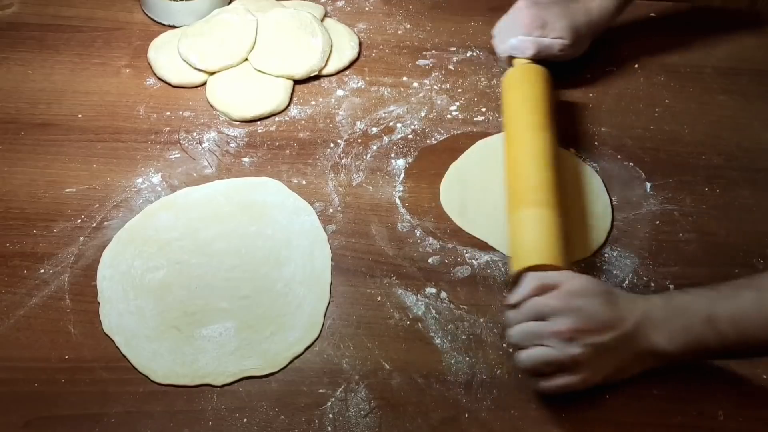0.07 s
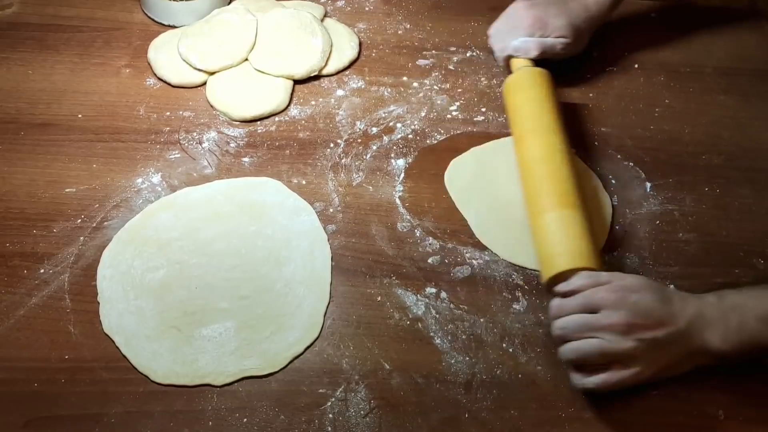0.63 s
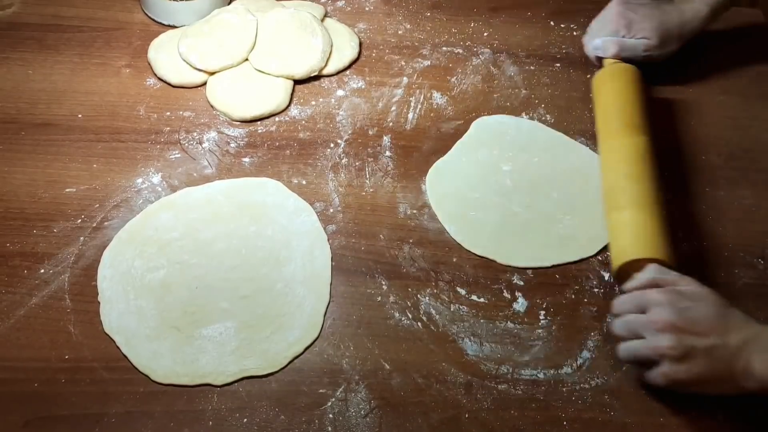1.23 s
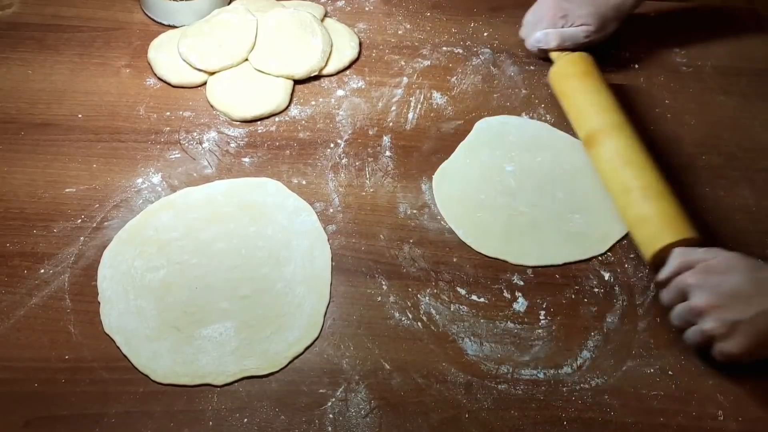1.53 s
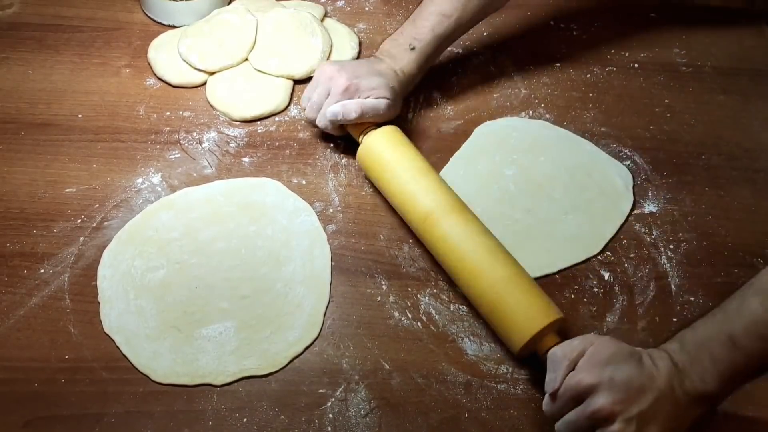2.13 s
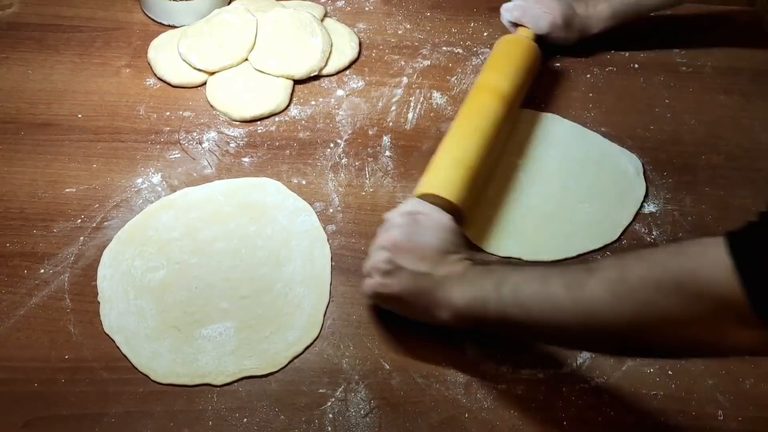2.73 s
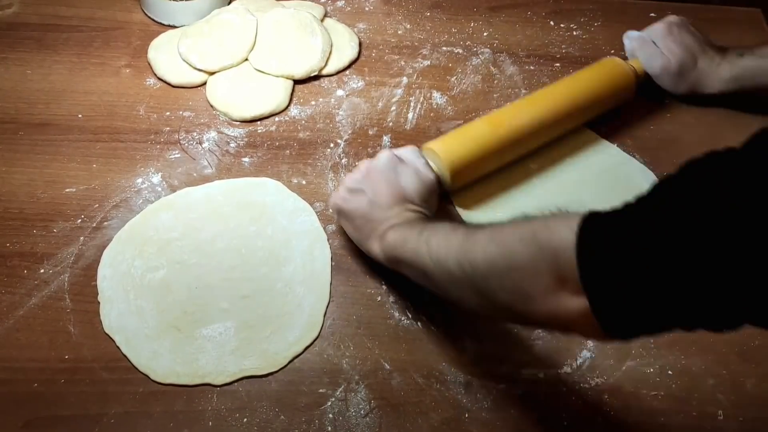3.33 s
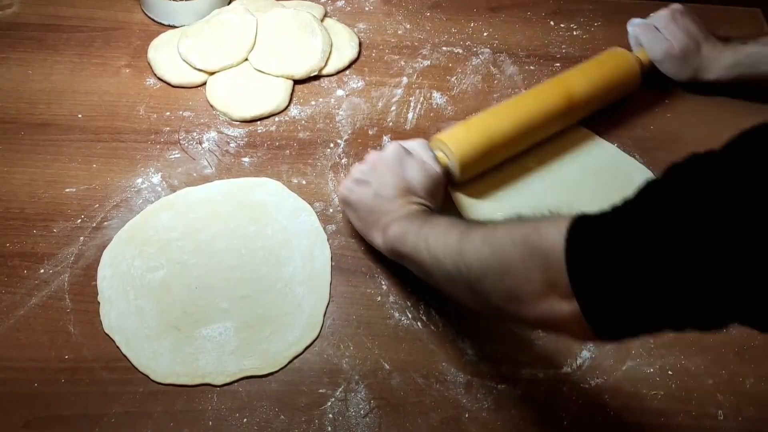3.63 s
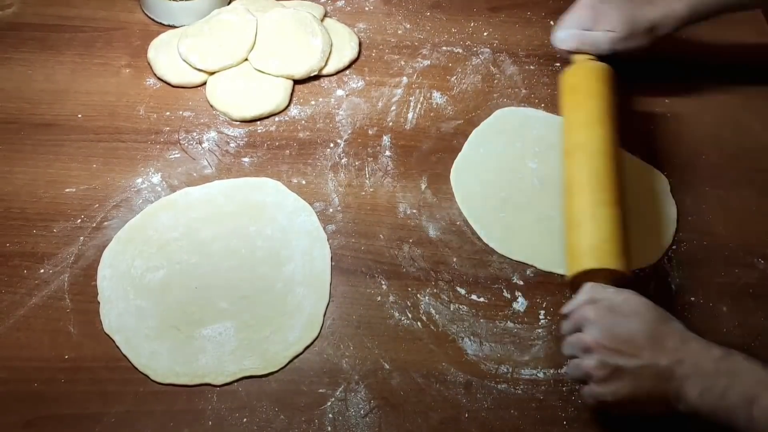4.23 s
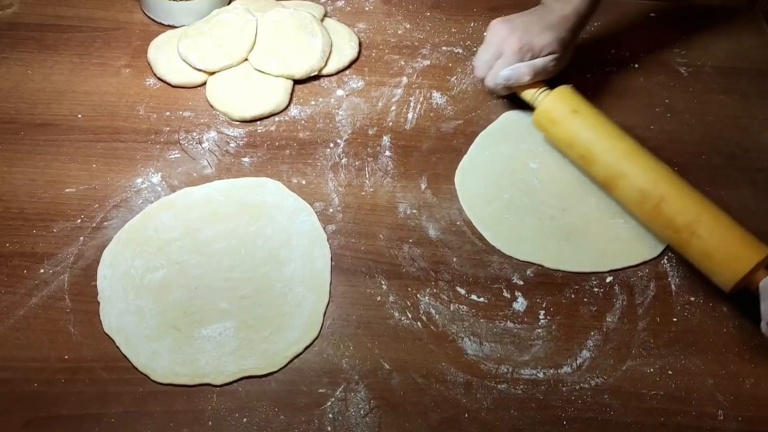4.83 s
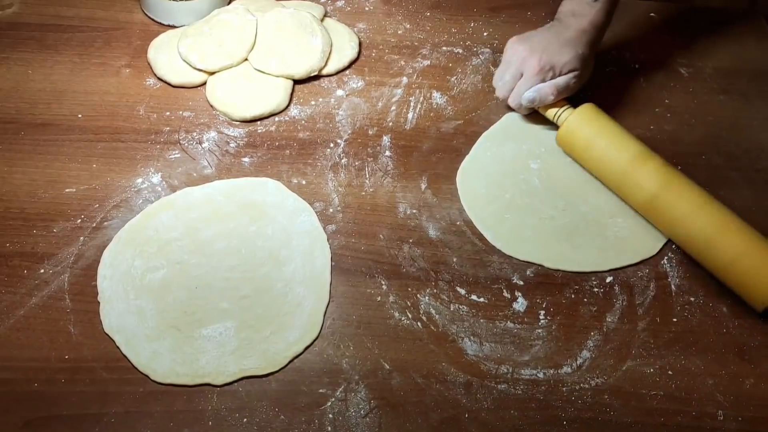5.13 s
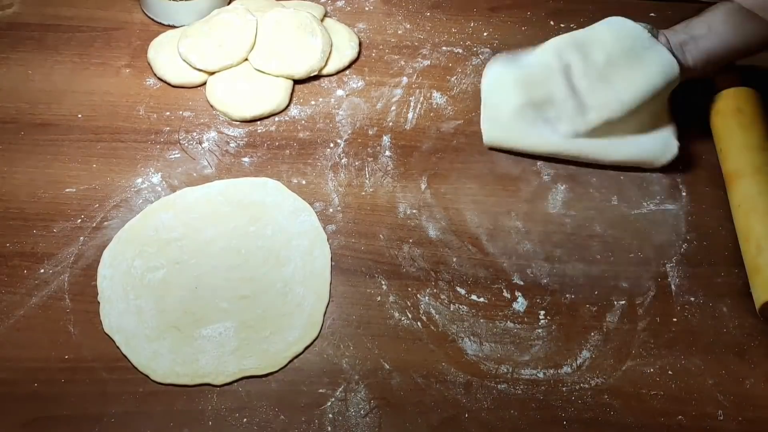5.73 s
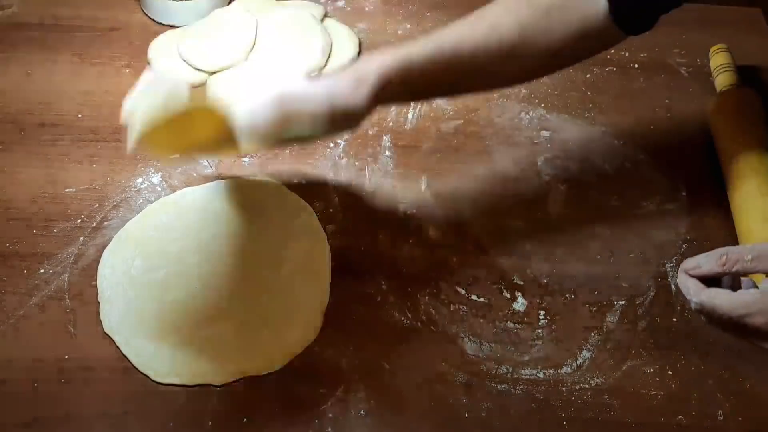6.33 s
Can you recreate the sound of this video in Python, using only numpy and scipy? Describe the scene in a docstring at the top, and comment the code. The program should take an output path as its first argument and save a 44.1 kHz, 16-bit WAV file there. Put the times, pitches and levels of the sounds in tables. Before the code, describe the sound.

A wooden rolling pin works dough on a floured wooden table in a small, quiet room. Each stroke makes a soft, fine swish as the pin turns in the hands. The pin thuds unevenly on the table, with one hard clack early on and a brief squeak midway. At the end the dough slides faintly off the wood and gives one soft flap.

```python
"""Rolling out dough.

A wooden rolling pin works a round of dough on a floured wooden table in a small room. Each stroke
swishes as the pin turns in the hands; the pin thuds on the table where it runs off the dough, sometimes
with a hard clack. At the end the dough slides off the table and is lifted with a soft flap."""
import sys
import numpy as np
from scipy import signal
from scipy.fft import rfft, irfft
from scipy.io import wavfile
from scipy.ndimage import uniform_filter1d

SR = 44100
rng = np.random.default_rng(int(sys.argv[2]) if len(sys.argv) > 2 else 0)


def dump(signal):
    """Clip the signal to [-1, 1] and save it as 16-bit WAV at the path in sys.argv[1]."""
    limited = np.clip(np.atleast_2d(signal).T, -1, 1)
    pcm = np.round(limited * 32767).astype(np.int16)
    wavfile.write(sys.argv[1], SR, pcm)


N = 285327
TIME = np.arange(N) / SR


def amp(db):
    """Decibels to gain."""
    return 10 ** (np.asarray(db) / 20)


def unit(x):
    """Scale to rms 1."""
    return x / np.sqrt(np.mean(x ** 2) + 1e-20)


def curve(points, hz):
    """Interpolate a table over log frequency."""
    points_hz, values = np.transpose(points)
    return np.interp(np.log(hz + 1), np.log(points_hz + 1), values)


def add(mix, start_s, sound):
    """Mix a sound in at start_s."""
    part = mix[max(round(start_s * SR), 0):][:len(sound)]
    part += sound[:len(part)]


def butter(x, hz, kind, order):
    """Causal low-pass or high-pass."""
    sos = signal.butter(order, np.clip(hz, 10, SR / 2 - 100), kind, fs=SR, output="sos")
    return signal.sosfilt(sos, x)


def noise(shape_db, coherence, samples, frame):
    """Stereo noise of rms 1, shaped by shape_db(seconds, Hz) and a left-right coherence table."""
    hop = frame // 4
    t = np.arange(samples // hop + 5)[:, None] * hop / SR
    hz = np.fft.rfftfreq(frame, 1 / SR)
    draws = rng.standard_normal((4, len(t), len(hz)))
    left, independent = draws[::2] + 1j * draws[1::2]
    shared = curve(coherence, hz)
    right = shared * left + np.sqrt(1 - shared ** 2) * independent
    spectra = np.array([left, right]) * amp(shape_db(t, hz))
    _, sound = signal.istft(spectra, nperseg=frame, noverlap=frame - hop, time_axis=1, freq_axis=2)
    return unit(sound[:, :samples])


# Quiet room. Each row: frequency in Hz, relative density in dB.
AMBIENCE_SPECTRUM = [(12, -44), (20, -4.5), (66, -12), (189, -19), (889, -33), (1020, -36), (1310, -37),
                     (2410, -41.5), (2930, -41.5), (8160, -49), (15000, -48)]
# Each row: frequency in Hz, left-right coherence.
AMBIENCE_COHERENCE = [(30, 0), (90, 0), (200, 0.49), (600, 0.6), (2000, 0), (10000, 0.031)]
# Each row: frequency in Hz, left minus right in dB.
AMBIENCE_BALANCE = [(40, -8.5), (200, -14), (700, -7.5), (2400, -0.5), (4400, -0.5), (14000, 2)]


def ambience(level_db=-59):
    """Steady low rumble and faint hiss."""
    sides = np.array([0.5, -0.5])[:, None, None]

    def shape_db(t, hz):
        return curve(AMBIENCE_SPECTRUM, hz) + sides * curve(AMBIENCE_BALANCE, hz)

    return amp(level_db) * noise(shape_db, AMBIENCE_COHERENCE, N, frame=4096)


# Room decay. Each row: frequency in Hz, T60 in seconds.
ROOM_T60 = [(100, 0.17), (300, 0.7), (600, .28), (1500, 0.23), (4000, 0.13), (12000, 0.39)]
# Each row: frequency in Hz, left-right coherence.
ROOM_COHERENCE = [(100, 1), (300, 0.3), (600, 0.15), (1100, 0.95), (2200, 0), (4000, 0.9), (12000, 0.51)]


def room_tail(spectrum, rise_s):
    """Diffuse decay with energy 1 per channel on average."""
    def shape_db(t, hz):
        return curve(spectrum, hz) - 60 * t / curve(ROOM_T60, hz)

    onset = 1 - np.exp(-TIME[:SR] / rise_s)
    return unit(onset * noise(shape_db, ROOM_COHERENCE, SR, frame=256)) / np.sqrt(SR)


def scuff(centre_hz, width_oct, decay_s, rise_s=0.0016, samples=8192):
    """Brief friction: a decaying burst of band noise."""
    t = TIME[:samples]
    offset_oct = np.log2((np.fft.rfftfreq(samples, 1 / SR) + 1) / centre_hz)
    band = np.exp(-0.5 * (offset_oct / width_oct) ** 2)
    hiss = unit(irfft(rfft(rng.standard_normal(samples)) * band))
    return hiss * np.minimum(t / rise_s, 1) * np.exp(-t / decay_s)


# Finger contacts. Each row: start in seconds, level in dB, band centre in Hz.
TOUCHES = [(0.762, -62, 1450), (1.174, -44.5, 408), (2.848, -67, 1620), (6.146, -70, 1000)]


def touches():
    """Fingers brush the pin or the table."""
    mix = np.zeros(N)
    for start_s, db, hz in TOUCHES:
        add(mix, start_s, amp(db) * scuff(hz, width_oct=0.36, decay_s=0.014))
    return mix


# Grip squeaks. Each row: start in seconds, level in dB, pitch in Hz.
SQUEAKS = [(.248, -59.5, 817), (3.31, -36.5, 622)]


def squeaks(tone_s=0.02, jitter=0.074, overtone_db=-24, rasp_db=-23):
    """The pin sticks and slips in the grip: an unsteady tone with a rasp."""
    mix, t = np.zeros(N), TIME[:8192]
    envelope = np.sin(np.pi * np.minimum(t / tone_s, 1))
    for start_s, db, hz in SQUEAKS:
        wobble = unit(uniform_filter1d(rng.standard_normal(len(t)), size=70))
        phase = 2 * np.pi * np.cumsum(hz * (1 + jitter * wobble)) / SR
        tone = np.sin(phase) + amp(overtone_db) * (np.sin(2 * phase) + 0.5 * np.sin(3 * phase))
        rasp = amp(rasp_db) * scuff(centre_hz=1290, width_oct=0.96, decay_s=0.039)
        add(mix, start_s, amp(db) * (tone * envelope + rasp))
    return mix


def handling(reverb_db=-1):
    """Touches and squeaks with their room reverberation."""
    direct = touches() + squeaks()
    room = room_tail([(200, 3.8), (4000, 22.0), (15000, 1.5)], rise_s=0.0016)
    return direct + amp(reverb_db) * signal.fftconvolve(direct[None], room, axes=1)[:, :N]


# Dough rustle. Each row: frequency in Hz, relative density in dB.
DOUGH_SPECTRUM = [(200, -11), (700, 8), (1500, 3), (3400, 2.5), (4600, -7), (7500, -10.5), (10500, -5),
                  (15000, -29)]
# Friction noise of dough and pin. Each row: frequency in Hz, left-right coherence.
FRICTION_COHERENCE = [(200, 0.69), (1000, 0.16), (3000, 0.29), (12000, 0.07)]


def dough(slide_at_s=5.66, slide_s=0.12, swing_s=0.04, flap_at_s=5.983, rise_s=0.0045, decay_s=0.026):
    """Floury dough slides off the wood, swings and flaps once against the hand."""
    slide = amp(-70) * np.exp(-((TIME - slide_at_s) / slide_s) ** 2)
    swing = amp(-66) * np.exp(-abs(TIME - flap_at_s) / swing_s)
    since_s = np.maximum(TIME - flap_at_s, 0)
    flap = amp(-50) * np.minimum(since_s / rise_s, 1) * np.exp(-since_s / decay_s)
    rustle = noise(lambda t, hz: curve(DOUGH_SPECTRUM, hz), FRICTION_COHERENCE, N, frame=512)
    return (slide + swing + flap) * rustle


# The pin turns or shifts in the grip. Each row: time of top speed in seconds, length in seconds,
# relative level in dB, mid-treble boost in dB.
STROKES = [(0.133, 0.23, -63.0, 2.5), (0.287, 0.12, -72, 3), (0.404, 0.24, -60.5, -4),
           (0.66, 0.26, -62.5, 1.5), (0.945, 0.43, -65, -1.5), (1.14, 0.24, -61.5, -1.5),
           (1.469, 0.24, -58, -5.5), (1.8, 0.19, -58, -3.5), (1.92, 0.1, -69, 3.5),
           (2.081, 0.2, -55.5, -0.5), (2.329, 0.23, -58.5, 2.0), (2.598, 0.31, -60, -2),
           (3.005, 0.21, -61.5, 0), (3.245, 0.34, -59, -2.0), (3.608, 0.33, -64.5, 2.5),
           (3.944, 0.2, -62.5, 2), (4.351, 0.22, -61, -2), (4.688, 0.21, -59, -4), (4.806, 0.09, -71, 3.5),
           (4.976, 0.2, -59, -3), (5.258, 0.16, -60, -3.0), (5.527, 0.18, -62, -3.0)]
# Floury wood on skin. Each row: frequency in Hz, relative density in dB.
RUB_SPECTRUM = [(150, 8), (500, -2), (900, -8), (1900, -4.5), (2700, -5.5), (3200, -4.5), (3600, -0.5),
                (4400, -5), (6000, -3), (7500, -5), (10200, 0.5), (11600, -7), (14000, -6.5), (15400, -20)]


def rubbing(gain_db=3, right_db=0.26, ripple_db=3.0, flutter_db=0.82, grip_hz=5500, grip_oct=0.44):
    """Floury wood slides on skin: a fine hiss that swells and brightens with each stroke's speed."""
    peak_s, length_s, level_db, boost_db = np.transpose(STROKES)

    def stroke_power(t):
        return amp(level_db) ** 2 * np.exp(-((t - peak_s) / (0.25 * length_s)) ** 2) + 1e-12

    def shape_db(t, hz):
        power = stroke_power(t)
        total = power.sum(1, keepdims=True)
        swell_db = 10 * np.log10(total)
        offset_oct = np.log2(np.maximum(hz, 1500) / grip_hz)
        # Each stroke grips differently, which shifts the weight of the hiss.
        grip_band = np.exp(-0.5 * (offset_oct / grip_oct) ** 2)
        grip_db = (power * boost_db).sum(1, keepdims=True) / total * grip_band
        tilt_db = 0.068 * (swell_db + 63) * (offset_oct - 1)  # flat at a swell of -63 dB
        # Random level ripple of the hiss over time and frequency.
        ripple = uniform_filter1d(rng.standard_normal((len(t), len(hz))), size=36, axis=0)
        ripple = unit(uniform_filter1d(ripple, size=7, axis=1))
        flutter = unit(uniform_filter1d(rng.standard_normal(t.shape), size=4, axis=0))
        random_db = ripple_db * ripple + flutter_db * flutter
        return curve(RUB_SPECTRUM, hz) + swell_db + grip_db + tilt_db + random_db

    rms = np.sqrt(stroke_power(TIME[::256, None]).sum(1).mean())
    hiss = noise(shape_db, FRICTION_COHERENCE, N, frame=512)
    return amp(gain_db) * rms * hiss * amp([[0], [right_db]])


# Modes of table and pin. Each row: frequency in Hz, relative level in dB, T60 in seconds.
WOOD_MODES = [(150.25, -1.5, 0.26), (167.4, 0.1, 0.29), (206.8, -6, 0.36), (228, -14, 0.29),
              (254.7, 4, 0.1), (274.6, -5, 0.3), (304.5, -7, 0.37), (333.7, -5, 0.27), (377, -7.5, 0.35),
              (409.5, -11, 0.5), (434, 5, 0.16), (488.5, -13.5, 0.31), (520, -16, 0.34), (580, -6, 0.35),
              (655, -9.5, 0.23), (650, -3.5, 0.29), (733, -8, 0.18), (773, -1.5, 0.28), (878, -13, 0.2),
              (904, -6, 0.35), (1004, 0, 0.19), (1060, -8.5, 0.32), (1177, 2.5, 0.22), (1460, -11, 0.45),
              (1560, -16.5, 0.14), (1575, -20.5, 1.0), (1967, -5.5, 0.19)]
# The thump and its first reflections. Each row: delay in seconds, relative gain.
THUMP_ARRIVALS = [(0, 0.44), (.00437, .78), (.00682, 1), (0.0132, .87), (0.0185, .96)]
# Dense higher modes and room. Each row: frequency in Hz, relative density in dB.
CLATTER_SPECTRUM = [(100, -31), (200, -7.5), (450, -6.5), (800, 1.5), (1400, -2), (2200, -3), (3000, -7),
                    (3800, 1), (5500, -7), (9000, -13), (15000, -21.5)]


def table_response(ring_db=-33, thump_db=8, crack_db=-3, clatter_db=7, scatter_hz=750):
    """Stereo impulse response of the table: ringing modes, thump, crack and clatter."""
    t, impulse = TIME[:SR], signal.unit_impulse(SR)
    hz, db, t60_s = np.transpose(WOOD_MODES)[:, :, None]
    envelopes = amp(ring_db + db - 60 * t / t60_s)
    # Low modes reach both sides in phase; high ones arrive scattered.
    skew_rad = np.minimum((hz / scatter_hz) ** 2, np.pi / 4) * rng.choice([-1, 1], hz.shape)
    phase = 2 * np.pi * hz * t
    ring = np.array([(envelopes * np.cos(phase + side * skew_rad)).sum(0) for side in (-1, 1)])
    thump = np.zeros(SR)
    for delay_s, gain in THUMP_ARRIVALS:
        add(thump, delay_s, gain * amp(thump_db) * butter(impulse, 700, "low", order=1))
    boom = butter(ring + thump, 138, "high", order=5)  # little radiates below the lowest mode
    late_right = signal.unit_impulse(SR, idx=5)
    crack = butter(np.array([impulse, late_right]), 1500, "high", order=1)
    clatter = room_tail(CLATTER_SPECTRUM, rise_s=0.002)
    return boom + amp(crack_db) * crack + amp(clatter_db) * clatter


# Pin meets table. Each row: start in seconds, relative strength in dB, hardness as a cutoff in Hz
# (low on dough, high on bare wood).
KNOCKS = [(1.3645, 9.5, 950), (1.3648, 3.5, 2590), (1.6879, -5, 293), (1.9896, 4.5, 316),
          (1.991, -18, 2030), (1.9995, -2.5, 1684), (2.0065, -2, 480), (2.207, -13, 240),
          (2.9101, 4.5, 435), (2.919, -9.5, 1710), (3.051, -20, 690), (3.164, -19, 460),
          (3.4808, -17.5, 2260), (3.482, -6, 864), (3.8305, -3, 290), (4.2045, -2, 265), (4.591, 0, 481),
          (4.8889, 2.5, 433), (4.899, -20, 1334), (5.162, -3, 408), (5.4311, -1, 444)]


def knocks(grit_db=-45, tick_db=-16, tick_decay_s=0.0015, variants=3):
    """Each contact is a force pulse, rounded by the cushioning dough; hard ones add a sharp tick."""
    forces, ticks = np.zeros((variants, N)), np.zeros((2, N))
    impulse = signal.unit_impulse(4096)
    grit = amp(grit_db) * butter(impulse, 1500, "low", order=2)
    tick_fade = np.exp(-TIME[:len(impulse)] / tick_decay_s)
    for k, (start_s, db, hardness_hz) in enumerate(KNOCKS):
        push = butter(impulse, hardness_hz, "low", order=4) + grit
        bass_cut_hz = 100 * (hardness_hz / 440) ** 1.84  # harder contacts excite less bass
        add(forces[k % variants], start_s, -amp(db) * butter(push, bass_cut_hz, "high", order=1))
        for channel in ticks:
            tick = butter(rng.standard_normal(len(impulse)) * tick_fade, hardness_hz, "low", order=2)
            tick = butter(tick, 5400, "high", order=2)
            tick = butter(tick, 6000, "low", order=3)
            add(channel, start_s, amp(db + tick_db) * tick)
    # The clatter varies a little from contact to contact.
    thuds = sum(signal.fftconvolve(force[None], table_response(), axes=1)[:, :N] for force in forces)
    return thuds + ticks


def scene():
    """Knocks, strokes, handling and the lifted dough over the quiet room."""
    return knocks() + rubbing() + handling() + dough() + ambience()


def record(dry):
    """Steep low-pass at 15450 Hz."""
    lowpass = signal.firwin(511, 15450, window=("kaiser", 9), fs=SR)
    return signal.oaconvolve(dry, lowpass[None], "same")


dry = scene()
out = record(dry)
dump(out)
```